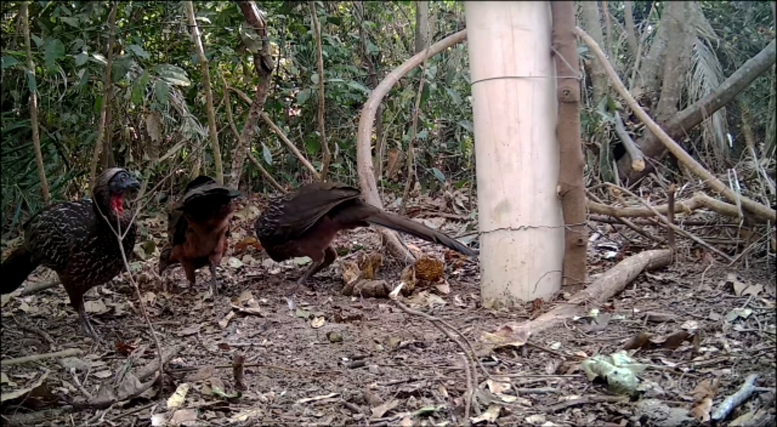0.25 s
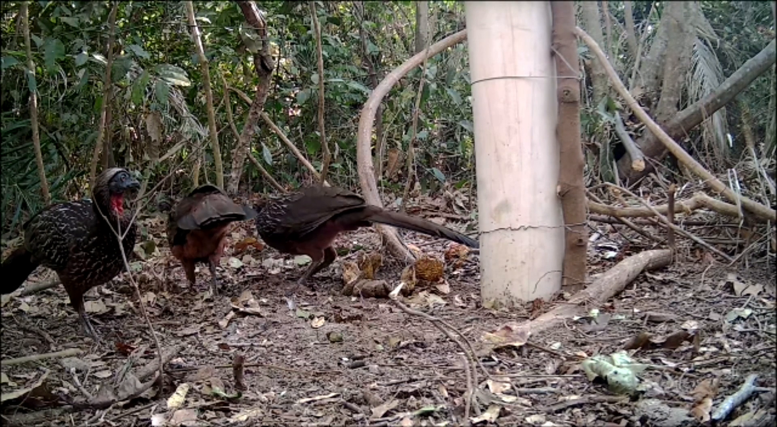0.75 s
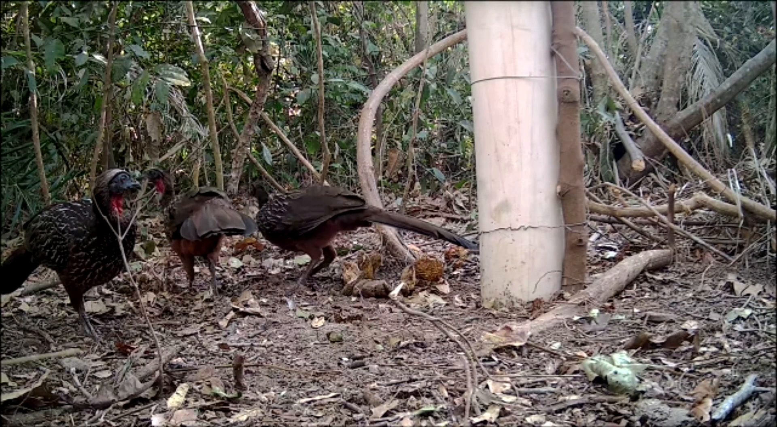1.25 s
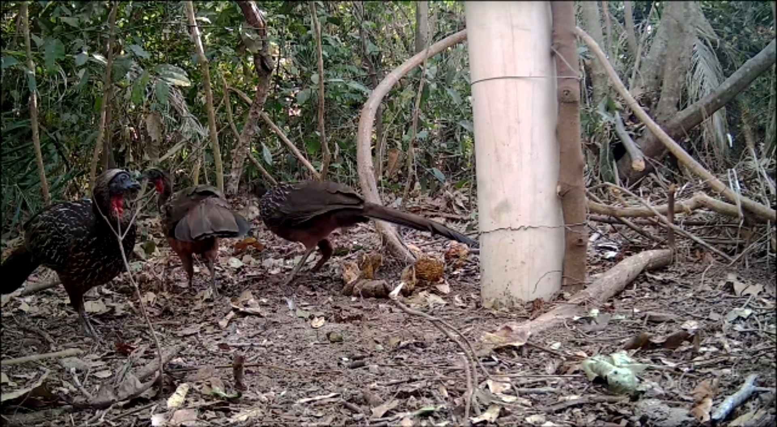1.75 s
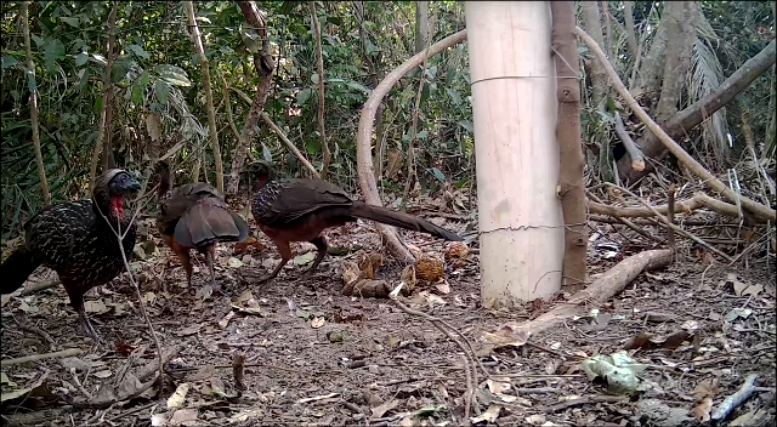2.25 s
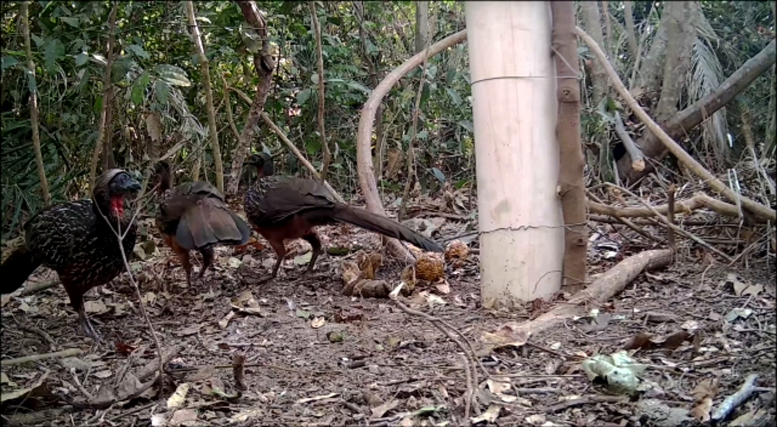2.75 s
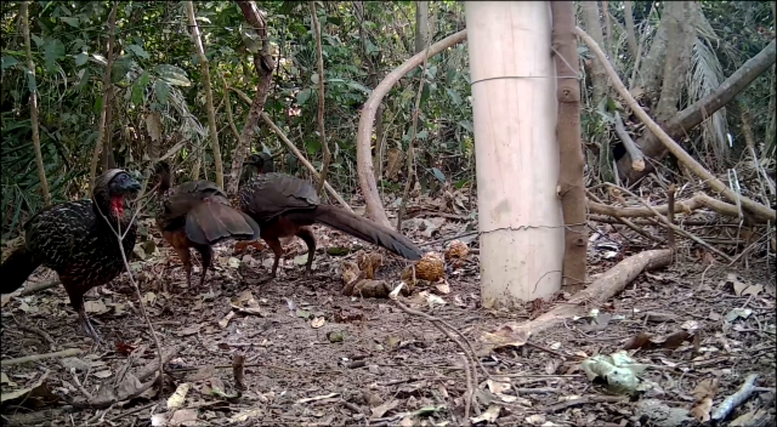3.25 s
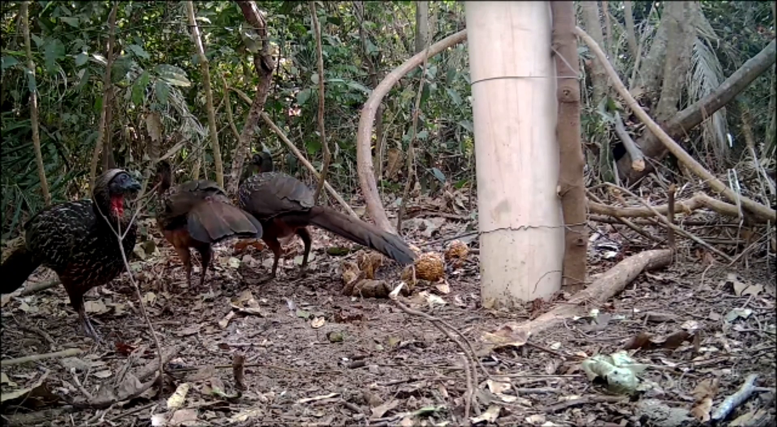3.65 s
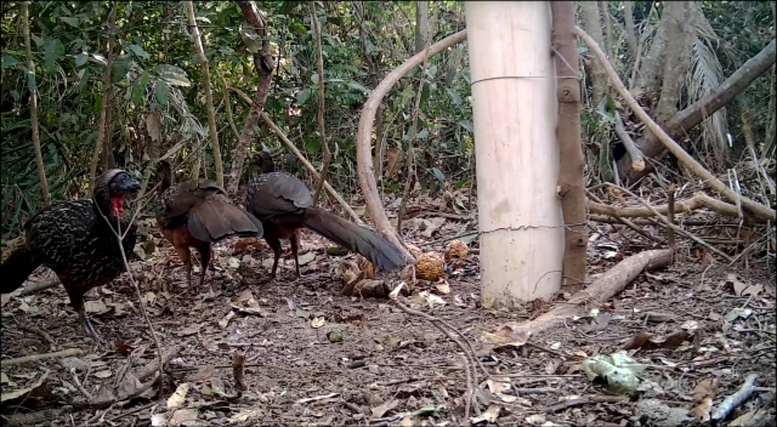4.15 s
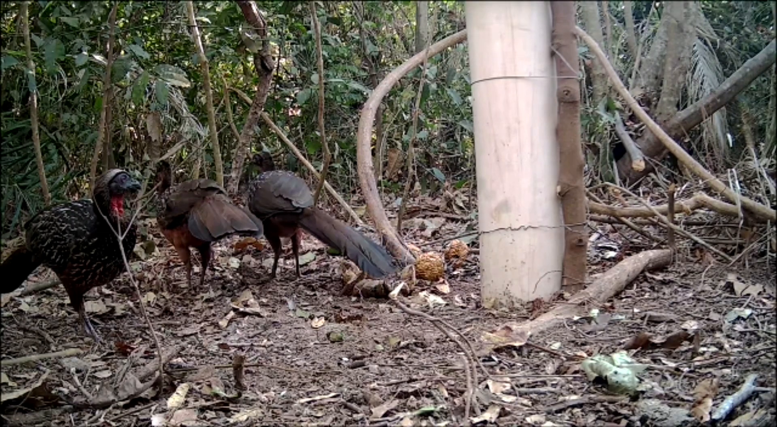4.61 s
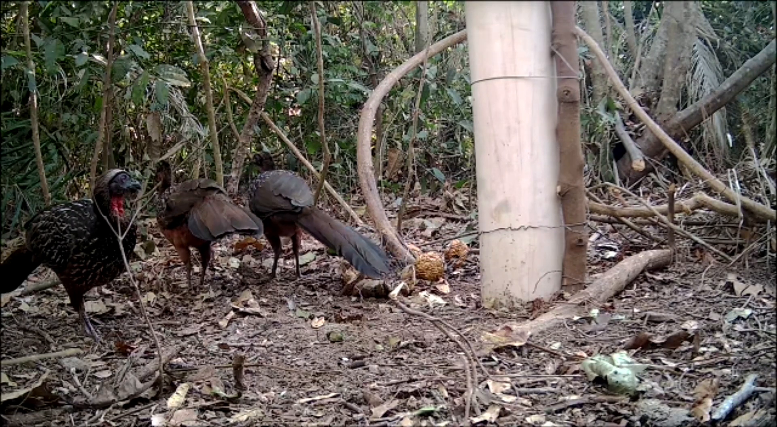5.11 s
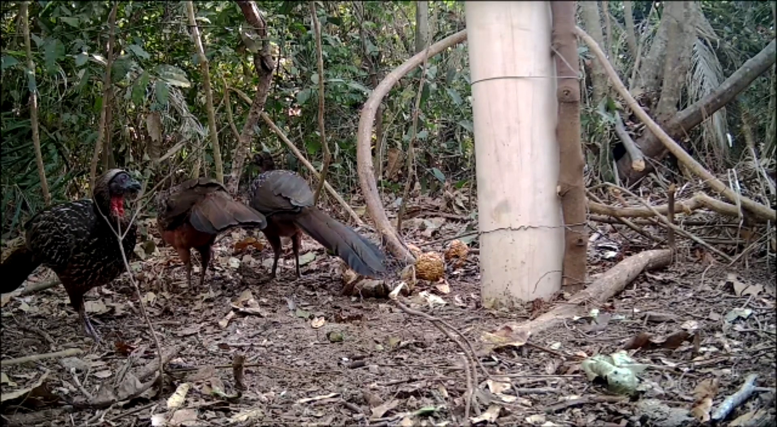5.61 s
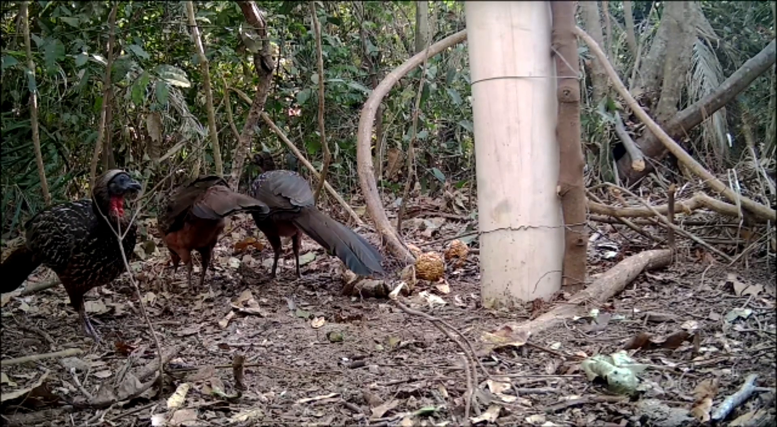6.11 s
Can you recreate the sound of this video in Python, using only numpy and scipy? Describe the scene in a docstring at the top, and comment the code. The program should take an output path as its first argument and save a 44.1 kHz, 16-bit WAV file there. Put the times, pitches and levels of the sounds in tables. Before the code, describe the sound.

High shimmering cricket chorus in a forest, katydids rasping and leaves crackling underfoot, after a split-second burst of hissier insects and a short gap.

```python
"""A moment of dense, hissing chorus with one dry tick, cut off by a short silence; then a forest floor
where large birds forage: crickets trill and chirp, katydids rasp, dry leaves snap now and then.
Insect calls are gliding sines and filtered tooth clicks; leaves are bursts of spiky noise grains.
Trunks scatter the calls as decaying noise echoes; behind lie shaped noise for far insects and a low
rumble, and a few wavering sines for a faint distant motor."""
import sys
import numpy as np
from scipy import signal
from scipy.fft import rfft, irfft, next_fast_len
from scipy.io import wavfile
from scipy.ndimage import map_coordinates

SR = 44100
rng = np.random.default_rng(int(sys.argv[2]) if len(sys.argv) > 2 else 0)


def to_wav(sig):
    """Store sig (one row per channel, or 1-D mono) as 16-bit WAV at the path in sys.argv[1].

    Samples outside -1..1 are clipped; the rate is SR.
    """
    pcm = np.clip(np.atleast_2d(sig), -1, 1) * 32767
    pcm = np.round(pcm).astype(np.int16)
    wavfile.write(sys.argv[1], SR, pcm.T)  # frames by channels


N = 280917
TIME = np.arange(N) / SR  # s


def amp(db):
    """Decibels to gain."""
    return 10 ** (np.asarray(db) / 20)


def unit(x):
    """Scale to rms 1."""
    return x / np.sqrt(np.mean(x ** 2) + 1e-20)


def curves(rows):
    """One value per sample for each column after the time."""
    s, *cols = np.transpose(rows)
    return [np.interp(TIME, s, c) for c in cols]


def wobble(knots_hz):
    """Smooth random curve with knots_hz knots a second."""
    return map_coordinates(rng.standard_normal(2048), [TIME * knots_hz], mode="wrap")


def filtered(x, response):
    """Filter x by a gain given as a function of frequency in Hz."""
    size = next_fast_len(N + 8192)
    hz = np.fft.rfftfreq(size, 1 / SR)
    return irfft(rfft(x, size) * response(hz), size)[:N]


def gain(points, hz):
    """Gain at hz, from (Hz, dB) points joined on a log frequency axis."""
    point_hz, point_db = np.transpose(points)
    return amp(np.interp(np.log(hz + 1), np.log(point_hz + 1), point_db))


def noise(points):
    """Coloured noise of rms 1."""
    return unit(filtered(rng.standard_normal(N), lambda hz: gain(points, hz)))


def tone(hz):
    """Sine of rms 1 that follows a pitch curve."""
    return np.sqrt(2) * np.sin(2 * np.pi * np.cumsum(hz) / SR)


def arch(u):
    """Half-sine swell between u = 0 and 1."""
    return np.sin(np.pi * np.clip(u, 0, 1))


def forest(x, t60_s, wet_db):
    """Direct sound plus the dying scatter of trunks and leaves, at about unchanged power."""
    t = np.arange(SR // 2) / SR
    tail = rng.standard_normal(len(t)) * amp(-60 * t / t60_s)
    echo = signal.fftconvolve(x, tail)[:N]
    mixed = x + amp(wet_db) * unit(echo) * np.std(x)
    return mixed / np.hypot(1, amp(wet_db))


def beats(runs):
    """One row per call, evenly spaced through each run."""
    rows = []
    for first_s, last_s, calls, *rest in runs:
        for s in np.linspace(first_s, last_s, int(round(calls))):
            rows.append((s, *rest))
    return rows


def paced(stroke_hz):
    """Strokes made so far at a slightly unsteady pace."""
    return np.cumsum(stroke_hz * (1 + 0.011 * wobble(3))) / SR


def trill(pitch_hz, fall_hz, strokes, duty, wet_db, scatter_hz):
    """Each closing stroke rings the wings at a new pitch and force; pitch sags as the stroke slows."""
    phase = strokes % 1
    u = np.clip(phase / duty, 0, 1)
    stroke_index = np.cumsum(np.diff(phase, prepend=0) < 0)
    detune, force_db = rng.standard_normal((1024, 2))[stroke_index].T
    pitch = pitch_hz + fall_hz * (.5 - u) + scatter_hz * detune
    song = arch(u) * amp(force_db) * tone(pitch)
    return unit(forest(song, 0.55, wet_db))


def notes(rows, length_s, fall_hz, flutter_hz, flutter, waver_hz):
    """Short falling tones, each fluttering in level and wavering in pitch."""
    out = np.zeros(N + SR)
    t = np.arange(int(length_s * SR)) / SR
    u = t / length_s
    all_knots = rng.standard_normal((len(rows), 64))
    for (s, hz, db), knots in zip(rows, all_knots):
        drift = map_coordinates(knots, [t * flutter_hz], mode="wrap")
        beat = 1 + flutter * np.sin(2 * np.pi * flutter_hz * t + 3 * knots[-1])
        shake = amp(drift) * beat  # drift also acts as dB
        pitch = hz + fall_hz * (.5 - u) + waver_hz * drift
        start = max(0, round((s - length_s / 2) * SR))
        out[start:][:len(t)] += amp(db) * arch(u) * shake * tone(pitch)
    return out[:N]


def background():
    """Low air rumble and far insect wash as shaped noise; a distant motor as sines sharing one speed."""
    # Each row: frequency in Hz, relative gain in dB.
    air_shape = [(13, -22), (22, -4), (49, 1.5), (65, 1), (144, -8), (267, -12), (291, -14.5), (340, -15.5),
                 (533, -18.5), (1350, -26.5), (1760, -42), (2970, -120)]
    wash_shape = [(1000, -33), (1400, -11.5), (1550, -1), (1800, -2.5), (2150, -9.5), (2900, -12),
                  (3500, -9), (4250, -10.5), (4900, 2), (5350, -1.5), (5800, 2), (6480, 3.5), (6850, -4),
                  (7300, 0.5), (9900, -15.5), (12300, -15.5), (15300, -31)]
    # Motor harmonics. Each row: frequency in Hz, level in dB before waver and swell.
    motor_lines = [(296, -66), (338, -65.5), (381, -70.5), (424, -71)]
    # Each row: time in s, motor swell in dB.
    motor_swell = [(0, -7.5), (3.8, -7), (4.7, -2.5), (5.3, 2), (5.8, 1), (6.37, -3)]
    air = amp(-50 + 0.84 * wobble(5.39)) * noise(air_shape)
    wash = amp(-49.0 + 0.56 * wobble(5.3)) * noise(wash_shape)
    speed = 1 + 0.004244 * wobble(3)
    motor = sum(amp(db + 2.8 * wobble(6)) * tone(hz * speed) for hz, db in motor_lines)
    swell_db, = curves(motor_swell)
    return air + wash + amp(swell_db) * motor


def far_chirpers(pitch_hz, spread_hz, count):
    """Distant crickets take turns, and their chirps blur together."""
    late, pitch, loud = rng.random((count, 3)).T
    start_s = (np.arange(count) + late) * N / SR / count
    rows = np.transpose([start_s, pitch_hz + spread_hz * (pitch - .5), 6 * loud])
    chirps = notes(rows, length_s=0.036, fall_hz=130, flutter_hz=103, flutter=0.4, waver_hz=25)
    return unit(forest(chirps, 0.11, 6.6))


def whistle():
    """A very high, hoarse glide, probably a small bird: a sine with fast pitch jitter."""
    # Each row: time in s, pitch in Hz, level in dB.
    glide = [(3.78, 9300, -85), (3.87, 9750, -61), (3.97, 11000, -68), (4.06, 11850, -64),
             (4.13, 11900, -67), (4.22, 11460, -69.5), (4.32, 11200, -85)]
    hz, db = curves(glide)
    return forest(amp(db) * tone(hz + 130 * wobble(400)), 0.54, 2.8)


def leaves():
    """Each step of the birds breaks dry leaf in a burst of spiky grains."""
    # Each row: start in s, level in dB, time to fall by e^2 in s, brightness in dB per octave.
    steps = [(0.401, -54, 0.1, -8), (0.618, -42, 0.0049, 5), (0.656, -55, 0.13, -9),
             (2.334, -53, 0.045, -5), (2.353, -45.5, .018, -1.2), (3.079, -46, 0.0075, -1),
             (3.39, -57, 0.14, 2), (3.462, -52, 0.023, 5), (3.668, -52, 0.023, -9), (4.094, -55.5, 0.3, -1),
             (6.155, -42.5, 0.0064, -2)]
    # Each row: frequency in Hz, relative gain in dB.
    leaf_shape = [(300, -37), (1200, 7.5), (5000, 18), (8000, 0), (12500, 9.5), (15000, -22)]
    out = np.zeros(N + SR)
    t = np.arange(8192) / SR
    hz = np.fft.rfftfreq(len(t), 1 / SR)
    for s, db, length_s, tilt_db in steps:
        grains = rng.standard_normal(len(t)) * np.sqrt(rng.exponential(size=len(t)))
        tilt = amp(tilt_db * np.log2(hz / 4000 + .05))
        crackle = unit(irfft(rfft(grains) * gain(leaf_shape, hz) * tilt))
        out[round(s * SR):][:len(t)] += amp(db) * crackle * np.exp(-2 * t / length_s)
    return forest(out[:N], .2, -6)


def katydids():
    """Rasps are runs of tooth clicks that ring a broad wing resonance."""
    # Even runs. Each row: first in s, last in s, rasps, level in dB before trim, shrillness 0-1.
    rasp_runs = [(.35, 0.7, 2, -46, 0.6), (1.06, 1.35, 2, -55, 0.1), (1.705, 2.6, 4, -53, .15),
                 (2.99, 3.22, 2, -54.5, 0), (3.6, 4.4, 3, -56, .05), (3.435, 5.2, 6, -45.5, 1),
                 (5.4, 6.33, 4, -52.5, 0.1), (6.18, 6.1, 1, -45.5, 0.99)]
    # Wing resonances. Each row: frequency in Hz, relative gain in dB.
    dull_body = [(6950, -35), (7500, 0), (8450, 4), (8700, 6.5), (9150, -11), (9650, -43), (10500, -64)]
    shrill_body = [(6950, -39), (7500, 3), (8500, 3), (9000, -0.5), (9500, -2), (9850, -12), (10500, -54)]
    dull, shrill = np.zeros(N), np.zeros(N)
    for s, db, shrillness in beats(rasp_runs):
        length_s = .22 + .05 * shrillness  # shrill rasps last longer
        swell = amp(db) * np.abs(arch((TIME - s) / length_s + .5)) ** 0.66
        dull += swell * np.sqrt(np.clip(1 - shrillness, 0, 1))
        shrill += swell * np.sqrt(np.clip(shrillness, 0, 1))

    def wing(teeth_hz, body):
        """Decaying noise click per tooth, through the wing resonance."""
        teeth = np.cumsum(teeth_hz * (1 + .01 * wobble(4))) / SR
        clicks = np.exp(-2.2 * (teeth % 1)) * rng.standard_normal(N)
        return unit(filtered(clicks, lambda hz: gain(body, hz)))

    dull_song = forest(amp(2) * dull * wing(164, dull_body), 0.3, -1.6)
    shrill_song = forest(amp(-2.5) * shrill * wing(158, shrill_body), 0.41, 4)
    return dull_song + shrill_song


def chirpers():
    """Level chirps, falling chirps and far peeps: short tones, each kind at its own depth in the wood."""
    # Crickets on their own beats, then runs of falling chirps.
    # Each row: first in s, last in s, chirps, mean pitch in Hz, level in dB before scatter and trim.
    level_runs = [(.36, 5.88, 11, 7585, -44), (.55, 6.32, 12, 7890, -48), (.61, 6.03, 11, 7803, -44.5),
                  (.785, 2.51, 4, 7822, -43.5), (.645, 1.215, 2, 7610, -40)]
    falling_runs = [(.53, 1.665, 4, 7260, -41), (2.052, 3.62, 5, 7245, -37.5), (1.94, 3.905, 6, 7250, -36),
                    (.74, 3.07, 7, 7395, -43), (4.03, 4.86, 3, 7380, -42), (4.59, 6.17, 5, 7460, -38),
                    (4.25, 5.43, 4, 7130, -46), (.91, 1.625, 4, 6655, -45.5)]
    # Peeps, two at a time. Each row: time of the first in s, level in dB before scatter and trim.
    peep_pairs = [(.39, -56.5), (1.67, -58), (2.555, -58), (2.85, -64), (3.385, -57), (3.7, -55),
                  (4.845, -56), (4.97, -60), (5.1, -60), (5.39, -57), (5.725, -57)]
    peep_hz, peep_gap_s = 3467, .058
    scatter_hz, scatter_db = 10.8, 1  # from one call to the next

    def varied(rows):
        """Scatter the pitch and level of each call."""
        return np.array(rows) + rng.standard_normal((len(rows), 3)) * [0, scatter_hz, scatter_db]

    peep_rows = [(s + delay, peep_hz, db) for s, db in peep_pairs for delay in (0, peep_gap_s)]
    level = notes(varied(beats(level_runs)),
                  length_s=.1, fall_hz=15, flutter_hz=175, flutter=.3, waver_hz=9)
    level = forest(level, .28, -6)
    falling = notes(varied(beats(falling_runs)),
                    length_s=.033, fall_hz=260, flutter_hz=118, flutter=.5, waver_hz=35)
    falling = forest(falling, .22, -5)
    peeps = notes(varied(peep_rows),
                  length_s=.03, fall_hz=30, flutter_hz=130, flutter=.5, waver_hz=75)
    peeps = forest(peeps, .18, -2)
    return amp(-2.6) * level + amp(-.6) * falling + amp(-3) * peeps


def trillers():
    """A near cricket in bouts, a second behind it and a far crowd, all at their own stroke rates."""
    # Near cricket. Each row: start in s, end in s, strokes a second, level in dB before trim.
    bouts = [(.309, .783, 44, -46), (0.784, 1.136, 44.5, -39.5), (1.176, 1.404, 44.5, -36.5),
             (1.408, 1.541, 41, -43), (1.539, 1.61, 45, -36.5), (1.67, 1.79, 44.4, -37),
             (1.873, 2.185, 43.5, -37.5), (2.236, 2.439, 48, -35), (2.884, 3.24, 45.7, -42.5),
             (3.316, 4.29, 46, -43), (4.449, 4.541, 44.4, -41.5), (4.721, 5.311, 45.5, -39),
             (5.418, 6.4, 46, -46)]
    # Each row: time in s, level in dB before lulls.
    second_level = [(.33, -42), (.7, -45.5), (.98, -39.5), (1.3, -49), (1.5, -50), (1.7, -48), (2.1, -55),
                    (2.38, -51), (2.54, -45), (2.73, -53), (2.9, -49.5), (3.4, -45), (4.08, -42.5),
                    (4.6, -50.5), (5.15, -53.5), (5.5, -44), (6.37, -43.5)]
    crowd_level = [(.33, -44.5), (.9, -41), (1.5, -46), (2.1, -52), (2.75, -44), (2.88, -45), (3.5, -42),
                   (4.05, -45), (4.65, -52), (4.8, -54), (5.2, -52), (5.36, -41.5), (6.37, -46)]
    # Far crowd. Each row: pitch in Hz, fall in a stroke in Hz, strokes a second, relative level in dB.
    crowd_voices = [(6055, 340, 42, 6), (6030, 220, 46, 2.5), (5918, 220, 24, 1.5), (5836, 220, 55, 0.5)]
    # All but the near cricket dip. Each row: middle in s, length in s, depth in dB (negative: a rise).
    lulls = [(1.833, 0.088, 2), (2.195, .05, -2), (3.271, 0.073, 8)]
    edge_s = 0.017  # rise and fall of a bout
    effort = amp(-52.5)  # floor that also sounds between bouts
    strokes = np.zeros(N)
    for start_s, end_s, stroke_hz, db in bouts:
        inside = np.minimum(TIME - start_s, end_s - TIME) / edge_s + .5
        effort = effort + amp(db) * np.clip(inside, 0, 1)
        strokes = np.where(TIME < start_s, strokes, (TIME - start_s) * stroke_hz)  # afresh each bout
    near = amp(-3.5) * effort * trill(6222, 130, strokes, duty=.66, wet_db=-7, scatter_hz=17)
    second = trill(6088, 60.03, paced(43), duty=0.87, wet_db=-1.5, scatter_hz=10.2)
    crowd = np.zeros(N)
    for hz, fall_hz, stroke_hz, db in crowd_voices:
        voice = trill(hz, fall_hz, paced(stroke_hz), duty=.6, wet_db=0.0, scatter_hz=35.14)
        crowd += amp(db) * voice
    lull_db = sum(depth_db * arch((TIME - s) / length_s + .5) for s, length_s, depth_db in lulls)
    second_db, = curves(second_level)
    crowd_db, = curves(crowd_level)
    return near + amp(-lull_db) * (amp(second_db) * second + amp(crowd_db) * unit(crowd))


def opening():
    """A dense chorus: quick trills inside a broad, flickering noise hiss, and one dry twig tick."""
    # Each row: frequency in Hz, relative gain in dB.
    hiss_shape = [(18, -55), (30, -10), (158, -18), (281, -15.5), (426, -20.5), (511, -15), (581, -29.5),
                  (645, -16.5), (859, -27), (2190, -17), (3500, -21.5), (6040, -3.5), (7060, -13.5),
                  (9640, -19), (15000, -44.5)]
    tick_shape = [(300, -12.5), (1200, 1), (3500, -2.5), (8000, -24.5)]
    tick_s, tick_decay_s = .07, .003
    singers = np.zeros(N)
    for hz in (4680, 5300, 6170, 6300):
        strokes = paced(rng.uniform(60, 75.5))
        singers += trill(hz, 300, strokes, duty=0.404, wet_db=0, scatter_hz=30.5)
    decay = np.exp(-np.abs(TIME - tick_s) / tick_decay_s)
    tick = (TIME > tick_s) * decay * noise(tick_shape)
    hiss = amp(-40.5 + 1.15 * wobble(270)) * noise(hiss_shape)
    return hiss + amp(-45.5) * unit(singers) + amp(-43.5) * tick


def scene():
    """The opening chorus stops dead; after the silence the forest fades quickly in."""
    cut_s, resume_s, fade_s = 0.114, 0.3008, 0.023
    far_high = amp(-50.5 + 2.1 * wobble(8)) * far_chirpers(7410, 423, count=320)
    far_low = amp(-61.5) * far_chirpers(6600, 230, count=45)
    wood = background() + far_high + far_low + whistle() + leaves() + katydids() + chirpers() + trillers()
    fade = np.clip((TIME - resume_s) / fade_s, 0, 1)
    return (opening() * (TIME < cut_s) + wood * fade)[None]


def record(dry):
    """Band limit: gain falls to nothing over the last 100 Hz below top_hz."""
    top_hz = 15450
    return filtered(dry[0], lambda hz: np.clip((top_hz - hz) / 100, 0, 1))[None]


dry = scene()
out = record(dry)
to_wav(out)
```